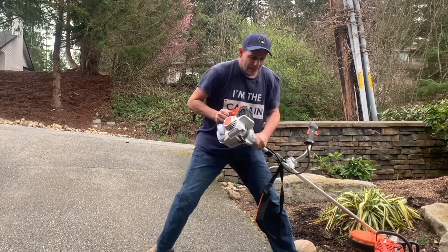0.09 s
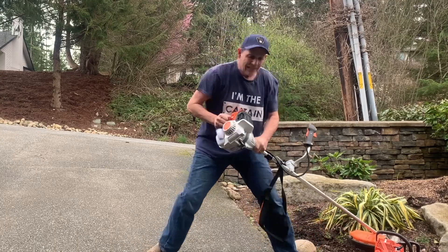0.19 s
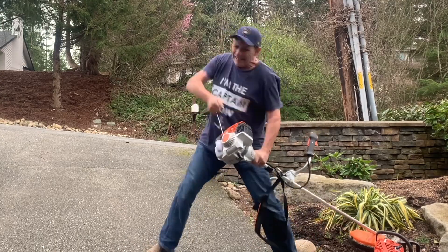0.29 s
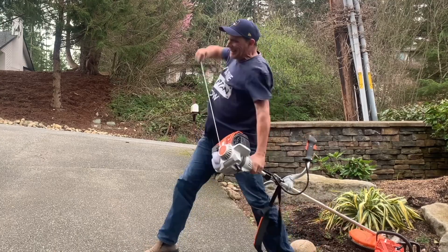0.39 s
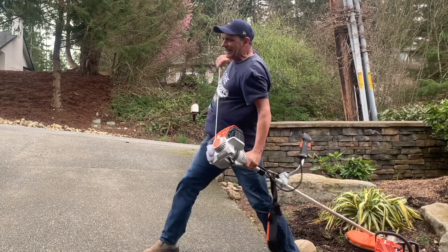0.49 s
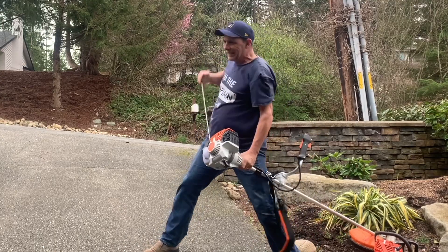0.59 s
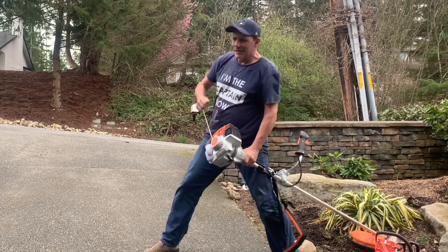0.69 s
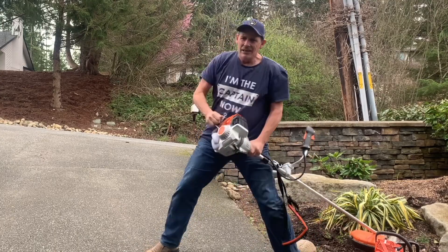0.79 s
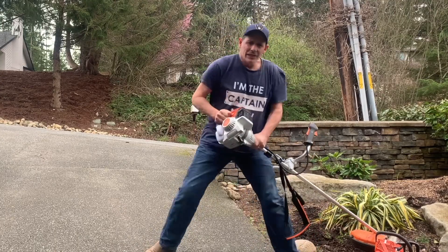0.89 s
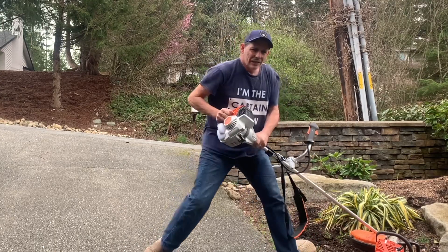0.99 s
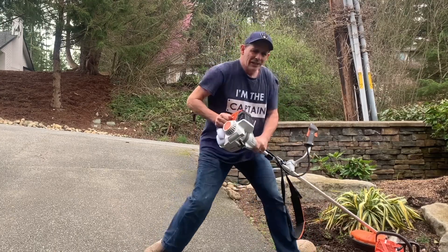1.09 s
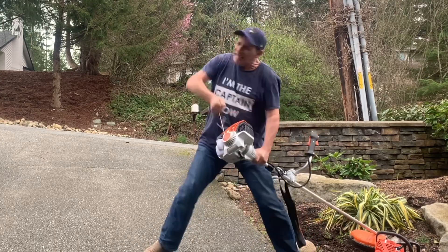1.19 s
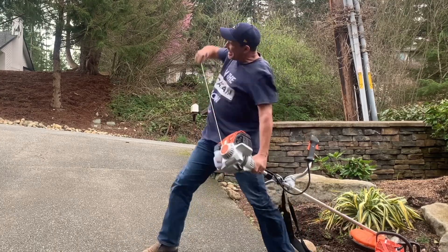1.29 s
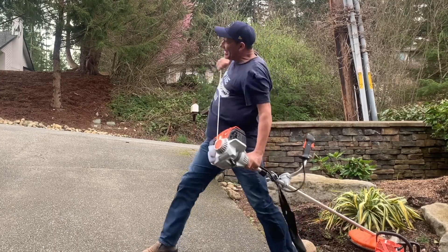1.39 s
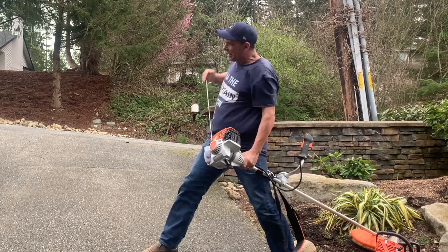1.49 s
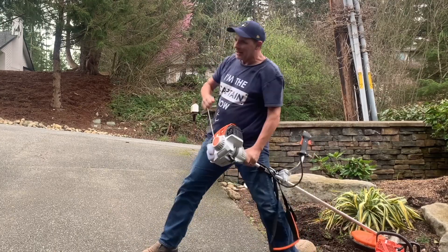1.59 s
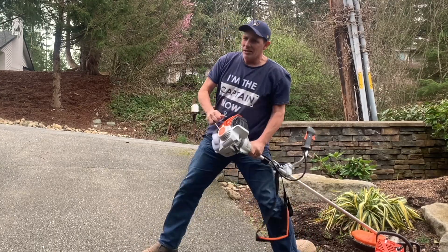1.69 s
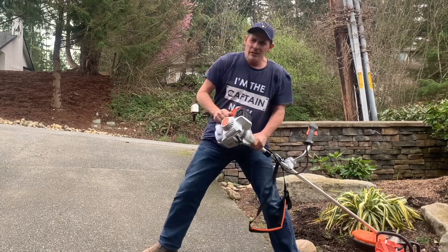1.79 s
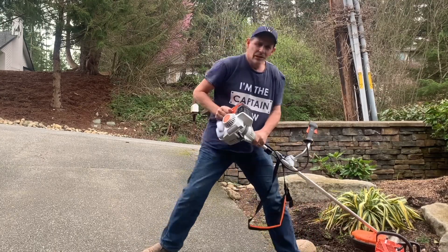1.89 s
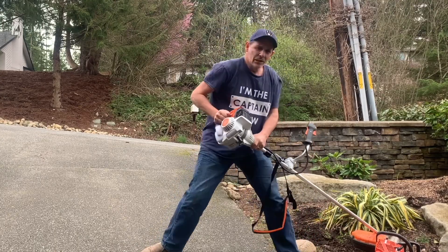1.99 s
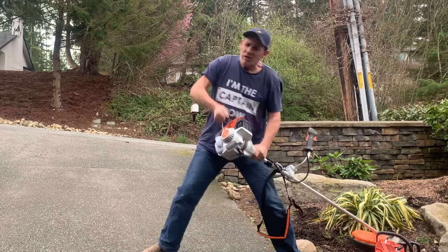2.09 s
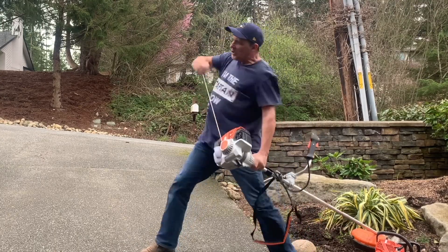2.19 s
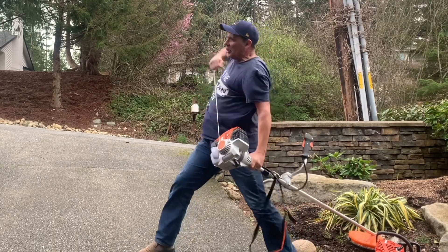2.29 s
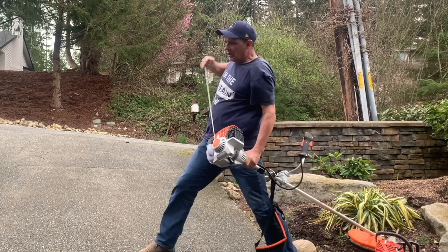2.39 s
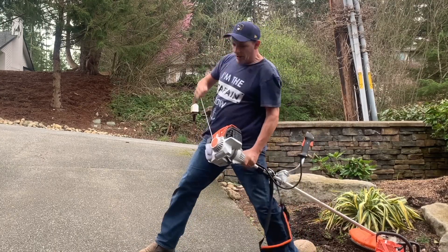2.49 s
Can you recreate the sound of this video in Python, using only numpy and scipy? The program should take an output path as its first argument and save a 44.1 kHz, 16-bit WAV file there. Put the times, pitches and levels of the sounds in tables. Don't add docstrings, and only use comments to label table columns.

```python
import sys
import numpy as np
from scipy import signal
from scipy.fft import rfft, irfft
from scipy.io import wavfile
from scipy.ndimage import uniform_filter1d

SR = 44100
rng = np.random.default_rng(int(sys.argv[2]) if len(sys.argv) > 2 else 0)


def invert_db(x):
    u = np.asarray(x, float) / 20
    return 10 ** u


def store_pcm(level_fs):
    pcm = np.round(np.clip(level_fs, -1, 1) * 32767).astype(np.int16)
    wavfile.write(sys.argv[1], SR, np.atleast_2d(pcm).T)


N = 112455

# [f/Hz, bandwidth/Hz, level/dB]
HOUSING_MODES = [(446, 140, -10.5), (604, 264, 0.5), (700, 84, 1.5), (1106, 57, -0.5), (1290, 158, 0.5),
                 (1600, 170, -4), (1962, 130, -4.5), (2378, 314, -9), (4125, 840, -15.5), (6010, 390, -14)]


def level(x, db):
    return x * invert_db(db) / np.sqrt(np.mean(x ** 2) + 1e-30)


def colour(x, points):
    hz, db = np.array(points, float).T
    log_f = np.log(np.fft.rfftfreq(N, 1 / SR) + 1)
    gain_db = np.interp(log_f, np.log(np.maximum(hz, 1)), db)
    return irfft(rfft(x) * invert_db(gain_db), N)


def band(x, hz, width):
    return signal.lfilter(*signal.iirpeak(hz, hz / width, SR), x)


def ring(x, hz, t60):
    r = np.exp(-np.log(1000) / (t60 * SR))
    w = 2 * np.pi * hz / SR
    return signal.lfilter([0, np.sin(w)], [1, -2 * r * np.cos(w), r * r], x)


def decay(t, t60):
    return np.exp(-np.log(1000) * t / t60)


def burst(start, attack, t60):
    t = np.arange(N) / SR - start
    return np.clip(t / attack, 0, 1) * decay(np.clip(t - attack, 0, None), t60)


def unit_peak(x):
    return x / np.abs(x).max()


def walk(rate):
    k = int(SR / rate)
    held = np.repeat(rng.standard_normal(N // k + 1), k)
    return 1.2 * uniform_filter1d(uniform_filter1d(held, k), k)[:N]


def clicks(rate, scatter_db):
    u, e = rng.random((N, 2)).T
    size_db = np.minimum(-np.log(1 - e), 2.5) * np.clip(scatter_db, 0, 4)
    sign = np.where(u < rate / SR / 2, 1, -1)
    return level((u < rate / SR) * invert_db(size_db) * sign, 0)


def effort(column):
    # [t/s, crank chuff level/dB, housing rattle level/dB, rope hiss level/dB]
    pulls = [
        [(0, -58.5, -48.5, -84), (.07, -52, -46, -71), (.13, -66, -50, -68)],
        [(.24, -53.5, -31.5, -44), (.29, -34, -28, -30.5), (.36, -32, -25.5, -32.5), (.41, -34.5, -30.5, -35),
         (.48, -37, -35.5, -42), (.6, -53.5, -36.5, -43), (.67, -53.5, -39.5, -42.5), (.74, -51, -40.5, -51),
         (.92, -92, -52, -64)],
        [(1.14, -53, -33.5, -50), (1.18, -35, -33, -33.5), (1.23, -32.5, -29.5, -29.5),
         (1.3, -31.5, -27.5, -34), (1.36, -39, -34, -43.5), (1.4, -39.5, -36.5, -47.5), (1.58, -54, -37.5, -43),
         (1.67, -73, -46, -63), (1.98, -69, -51.5, -60)],
        [(2.075, -45, -27, -48), (2.12, -32, -34, -34), (2.19, -35, -27.5, -31.5), (2.25, -30.5, -33.5, -38),
         (2.3, -40.5, -36.5, -42), (2.36, -42.5, -40.5, -52), (2.42, -48.5, -34.5, -42.5),
         (2.55, -71, -42, -41.5)],
    ]
    t = np.arange(N) / SR
    db = np.full(N, -90.)
    for pull in pulls:
        p = np.array(pull)
        at = np.r_[p[0, 0] - .02, p[:, 0], p[-1, 0] + .08]
        db = np.maximum(db, np.interp(t, at, np.r_[-90, p[:, column], -90]))
    return db


def crack():
    # [f/Hz, level/dB per Hz]
    crack_spectrum = [(1500, -2.5), (3000, -8.5), (5200, -14), (7000, 0), (9500, -5.5), (12000, -14),
                      (15500, -11)]
    contacts = rng.standard_normal(N) + .5 * clicks(2000, 9.0)
    return level(colour(contacts, [(300, -22.5)] + crack_spectrum), 0)


def catches():
    # [t/s, peak level/dB, lead of first touch/s, touch level/dB, cover ring level/dB]
    pawl_catches = [
        (.228, -5.5, 0.0051, -20.5, -16),
        (1.129, -6.5, 0.0057, -26, -28),
        (2.062, -4, 0.0102, -24.5, -18),
    ]
    # [f/Hz, level/dB, t60/s]
    pawl_modes = [(1052, -14, 0.1), (1180, 0.5, 0.04), (1237, 8.5, 0.032), (1450, -31, 0.013),
                  (1773, -2.5, 0.025), (1863, -15.5, 0.028), (2580, -53, 0.054), (4300, -14, 0.025),
                  (6040, -7, 0.037), (7400, -27, 0.019), (9180, -7, 0.082), (11390, -10, 0.032)]
    cover_hz, cover_t60_s = 700, 0.059
    mode_scatter_db = 4.6
    out, noise, time = np.zeros(N), crack(), np.arange(N) / SR
    for t, db, lead, touch_db, cover_db in pawl_catches:
        blows = rng.standard_normal(N) * burst(t, 0.00079, 0.024)
        tint = rng.standard_normal(len(pawl_modes))
        body = sum(invert_db(g + mode_scatter_db * c) * ring(blows, hz, t60)
                   for c, (hz, g, t60) in zip(tint, pawl_modes))
        out += invert_db(db) * (unit_peak(body) + invert_db(-11.5) * noise * burst(t, 0.00024, 0.074))
        cover = burst(t, 0.0095, cover_t60_s) * np.sin(2 * np.pi * cover_hz * (time - t))
        out += invert_db(cover_db) * cover
        touch = burst(t - lead, 0.0026, 0.023) + 0.16 * burst(t - lead - .012, 0.0094, 0.034)
        bright = level(band(noise, 6170, 343), -3)
        dull = level(band(noise, 870, 1400), -6.5)
        out += invert_db(touch_db) * touch * (0.47 * noise + bright + dull)
    return out


def rope_ends():
    # [t/s, level/dB, duration/s, spring ring level/dB]
    rope_snaps = [
        (0.363, -18, 0.022, -24),
        (1.279, -20, 0.021, -38),
        (2.206, -21, 0.024, -25),
    ]
    # [f/Hz, level/dB, t60/s]
    spring_modes = [(6050, 0, .55), (5960, -13, .4), (7270, -18, .3)]
    snap_hz, snap_per_s, crack_db = 1327, 2500, 1
    taut_excess, relax_s = .022, .09
    flutter_db = 3.5
    out, noise, t = np.zeros(N), crack(), np.arange(N) / SR
    for start, db, length, ring_db in rope_snaps:
        shape = np.sin(np.pi * np.clip((t - start) / length, 0, 1)) ** 0.57
        clatter = clicks(snap_per_s, 0.784) * shape
        body = ring(ring(clatter, snap_hz, 0.029), snap_hz, 0.0048)
        snap = shape + 1.1 * burst(start + length / 2, 0.0023, 0.0059)
        out += invert_db(db) * (unit_peak(body) * 2.82 + invert_db(crack_db) * noise * snap)
        bent = t - taut_excess * relax_s * np.exp(-np.clip(t - start, 0, None) / relax_s)
        flutter = invert_db(ring_db + flutter_db * walk(90))
        out += flutter * sum(invert_db(g) * burst(start + .003, .006, t60) * np.sin(2 * np.pi * hz * bent)
                             for hz, g, t60 in spring_modes)
    return out


def crank():
    # [f/Hz, bandwidth/Hz, level/dB]
    cavity_modes = [(72.2, 23, -5.5), (105, 58, -3), (159.4, 53.4, -1.5), (243.3, 22, -1), (476, 131, -5.5)]
    chuff_per_s, puff_scatter_db = 125, 5.0
    steps = np.cumsum(chuff_per_s * (1 + 0.23 * walk(40)) / SR)
    puffs = np.diff(np.floor(steps), prepend=0) * invert_db(puff_scatter_db * walk(150))
    push = level(puffs, 0) + 0.68 * clicks(300, 1.2)
    body = sum(invert_db(db) * band(band(push, hz, w), hz, 4 * w) for hz, w, db in cavity_modes)
    return level(body, 0) * invert_db(effort(column=1) + 3.0)


def housing_panel(chatter, hz, width):
    shared = 0.81 * chatter * invert_db(3.5 * walk(55))
    own = clicks(90, 2.0)
    return band(band(shared + own, hz, width), hz, 3 * width)


def rattle():
    # [f/Hz, level/dB per Hz]
    rope_spectrum = [(2000, -8), (3000, -7), (4000, -8), (5200, -15), (7500, -3), (9500, -10.5),
                     (11000, -13.5), (15300, -16)]
    rattle_per_s, scatter_db, flicker_db = 650, 7, 1.5
    chatter = clicks(rattle_per_s, scatter_db) * invert_db(2.0 * walk(46.52)) + 0.38 * rng.standard_normal(N)
    body = sum((-1) ** k * invert_db(g) * housing_panel(chatter, hz, w)
               for k, (hz, w, g) in enumerate(HOUSING_MODES))
    friction = rng.standard_normal(N) + 1.1 * clicks(1500, 2.6)
    hiss = colour(friction, [(1200, -31)] + rope_spectrum)
    body = level(body, 0) * invert_db(effort(column=2))
    return body + level(hiss, 0) * invert_db(effort(column=3) + flicker_db * walk(60))


def knock(start, db, hzs, treble_db, around_db, noise):
    n, at = 4096, int(start * SR)
    t = np.arange(n) / SR
    blow = rng.standard_normal(n) * np.clip(t / 0.00091, 0, 1) * decay(t, 0.011)
    around = sum((-1) ** k * invert_db(g) * band(blow, f, w)
                 for k, (f, w, g) in enumerate(HOUSING_MODES[:-2]))
    body = sum(invert_db(-3.5 * k) * unit_peak(ring(blow, hz, 0.034)) for k, hz in enumerate(hzs))
    body = body + invert_db(around_db) * unit_peak(around)
    tick = noise[at % (N - n):][:n] * np.clip(t / .0011, 0, 1) * decay(t, 0.03)
    out = np.zeros(N + n)
    out[at:at + n] = invert_db(db) * (unit_peak(body) + invert_db(treble_db) * tick)
    return out[:N]


def knocks():
    # [t/s, peak level/dB, f/Hz, second f/Hz, treble level/dB]
    loose_knocks = [(0.028, -29, 1035, 540, -50), (.063, -28.5, 644, 1420, -40),
                    (.102, -25.5, 1107, 1820, -24), (0.58, -19.5, 674, 1340, -13.5),
                    (.652, -23.5, 1130, 650, -8), (.747, -25, 715, 1300, -21), (.755, -33, 2280, 690, -9),
                    (.805, -21, 1040, 1480, -43), (.835, -33.5, 684, 1050, -18),
                    (.854, -37.5, 1400, 673, -5.5), (0.871, -37, 700, 1340, -20),
                    (.93, -52, 655, 1300, 1.5), (0.964, -31, 1530, 2190, -28),
                    (1.471, -19, 700, 1310, -14.5), (1.562, -27, 590, 1300, -17),
                    (1.678, -22, 690, 2360, -25), (1.727, -31, 1016, 625, -29),
                    (1.751, -17.5, 1080, 1535, -38), (1.753, -21, 580, 2300, -33),
                    (1.77, -30.5, 1100, 700, -21.5), (1.897, -29.5, 1060, 1510, -18),
                    (2.374, -24, 1280, 650, -28), (2.414, -27, 780, 1287, -26),
                    (2.454, -32, 1280, 660, -25), (2.479, -26, 1270, 660, 1), (2.516, -28, 1370, 660, -13)]
    # [t/s, peak level/dB, f/Hz]
    ratchet_teeth = [(.265, -25, 1296), (.288, -17, 611), (.305, -20, 1250), (.326, -16.5, 584),
                     (.35, -13, 1300), (.396, -12, 1290), (.427, -23, 590), (.428, -23.5, 1290),
                     (.462, -21, 1370), (.495, -30, 540), (.695, -36, 610), (1.18, -28, 1180),
                     (1.202, -20, 593), (1.217, -20, 1350), (1.23, -15.5, 573), (1.24, -23, 1250),
                     (1.247, -13, 470), (1.259, -16.5, 1310), (1.339, -21.5, 718), (1.356, -20.5, 1400),
                     (1.418, -29.5, 775), (1.588, -31.5, 563), (2.103, -22, 690), (2.127, -14, 563),
                     (2.15, -23.5, 1320), (2.157, -19, 581), (2.169, -19.5, 536), (2.17, -20, 1330),
                     (2.19, -25, 600), (2.28, -26, 1370), (2.295, -23.5, 650)]
    noise = crack()
    loose = sum(knock(t, db, (hz, second_hz), treble_db + 3.0, -4.0, noise)
                for t, db, hz, second_hz, treble_db in loose_knocks)
    return loose + sum(knock(t, db, (hz,), -20.5, -11.0, noise) for t, db, hz in ratchet_teeth)


def air():
    # [f/Hz, level/dB per Hz]
    air_spectrum = [(25, -12.5), (70, 4), (220, -2.5), (500, -11.5), (1650, -12), (3000, -16), (6400, -31),
                    (16000, -37.5)]
    air_db, swell_db = -53.5, 1.2
    return level(colour(rng.standard_normal(N), air_spectrum), air_db) * invert_db(swell_db * walk(1.1))


def smear(x, t60):
    tail = rng.standard_normal(N) * burst(0.0025, 0.0025, t60)
    return irfft(rfft(x) * rfft(level(tail, -10 * np.log10(N))), N)


def scene():
    # [f/Hz, lead/half turns]
    port_lead = [(30, .05), (500, 0.29), (1200, 0.35), (3000, 0.5), (4300, 0.37), (6500, 0.57)]
    # [f/Hz, lead/half turns]
    port_comb = [(7700, .8), (8100, .96), (8500, 1.0), (9000, 1.05), (9500, 1.4), (10400, 1.94),
                 (11500, 2.05), (12200, 2.6), (12700, 2.95), (13500, 3.0), (14200, 3.05), (15500, 3.95)]
    # [f/Hz, left minus right level/dB]
    port_balance = [(100, 1), (500, -2), (1500, 1.5), (3000, 0.5), (5700, -3)]
    wall_db, wall_t60_s = -15, 0.34
    likeness, side_db = .5, -1.5
    floor = signal.butter(4, 400, "high", fs=SR, output="sos")
    hits = signal.sosfilt(floor, catches() + rope_ends() + knocks())
    direct = crank() + rattle() + air() + hits
    mid = direct + invert_db(wall_db) * smear(direct, wall_t60_s)
    other_way = crank() + rattle() + air() + smear(hits, 0.0086)
    side = likeness * mid + np.sqrt(1 - likeness ** 2) * other_way
    hz, turns = np.array(port_lead + port_comb).T
    log_f = np.log(np.fft.rfftfreq(N, 1 / SR) + 1)
    half = np.pi / 2 * np.interp(log_f, np.log(hz), turns)
    m = irfft(rfft(mid) * np.cos(half), N)
    s = irfft(-1j * rfft(side) * invert_db(side_db) * np.sin(half), N)
    balance = port_balance + [(7000, 0)]
    left = colour(m + s, [(f, db / 2) for f, db in balance])
    right = colour(m - s, [(f, -db / 2) for f, db in balance])
    return np.array([left, right])


def roll_off(x):
    return signal.sosfilt(signal.butter(12, 16970, fs=SR, output="sos"), x)


def record(dry):
    x = signal.sosfilt(signal.ellip(10, .2, 60, 15700, fs=SR, output="sos"), dry)
    x = signal.sosfilt(signal.butter(3, 45, "high", fs=SR, output="sos"), x)
    return roll_off(x)


dry = scene()
out = record(dry)
store_pcm(out)
```